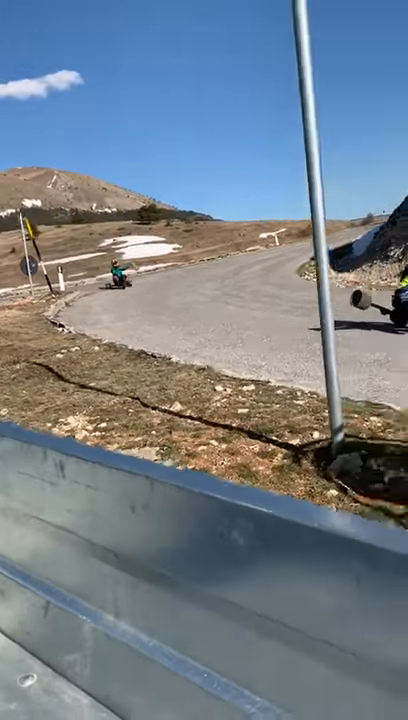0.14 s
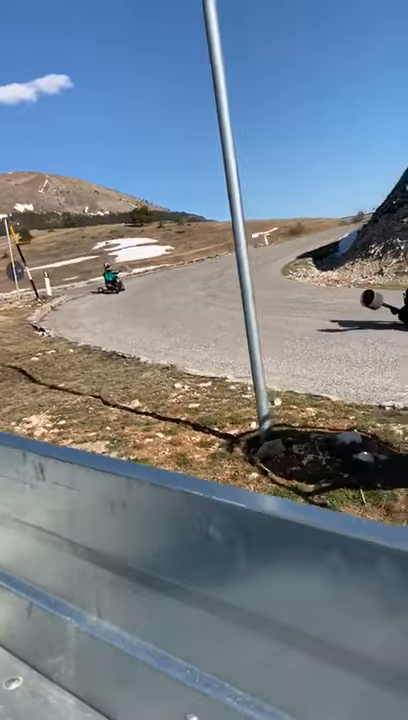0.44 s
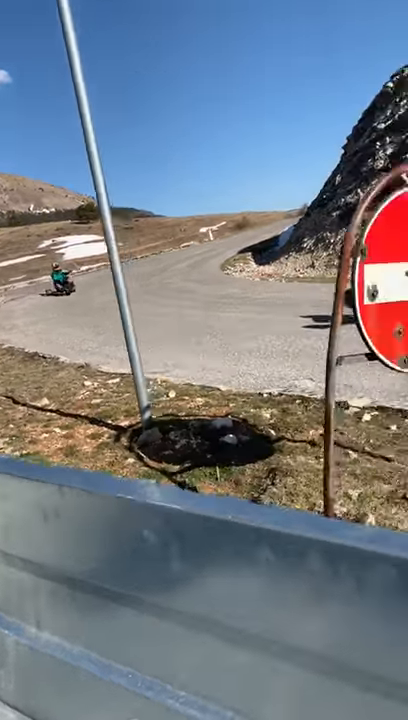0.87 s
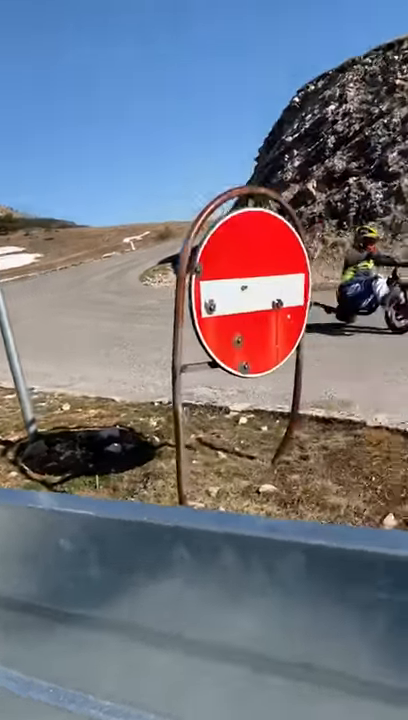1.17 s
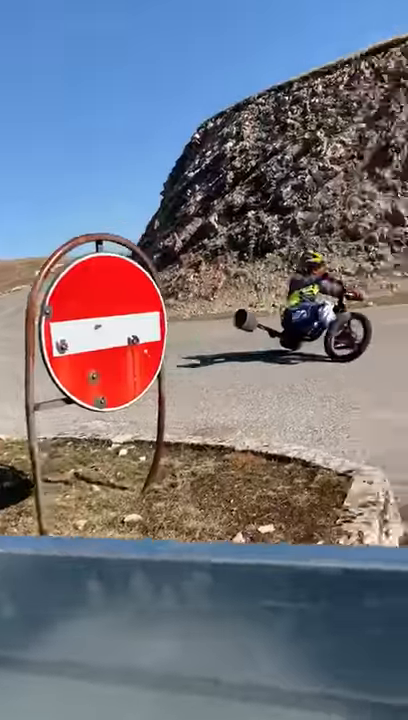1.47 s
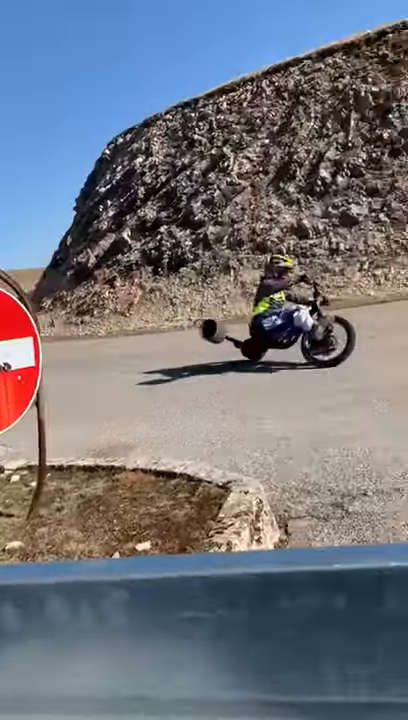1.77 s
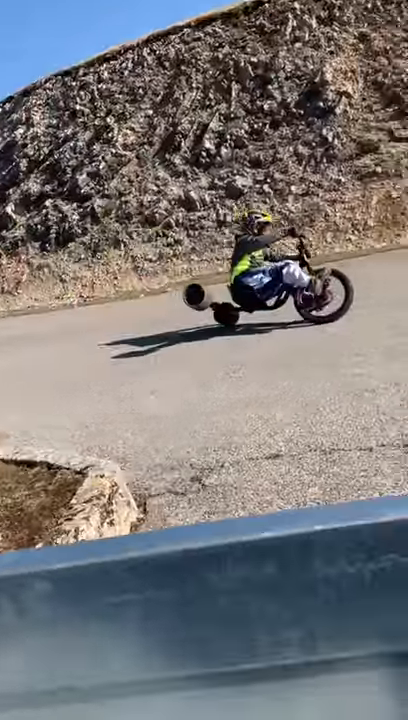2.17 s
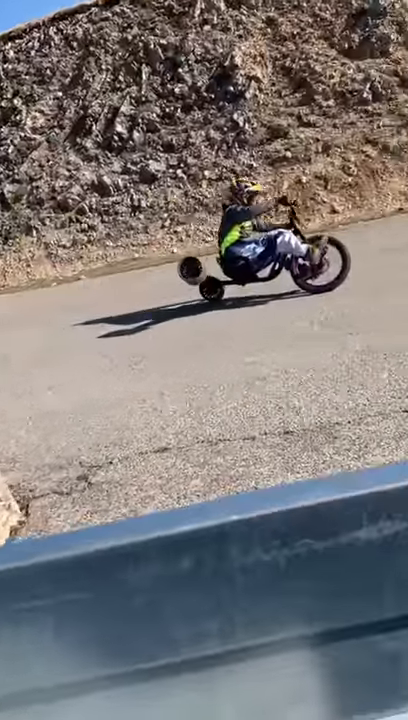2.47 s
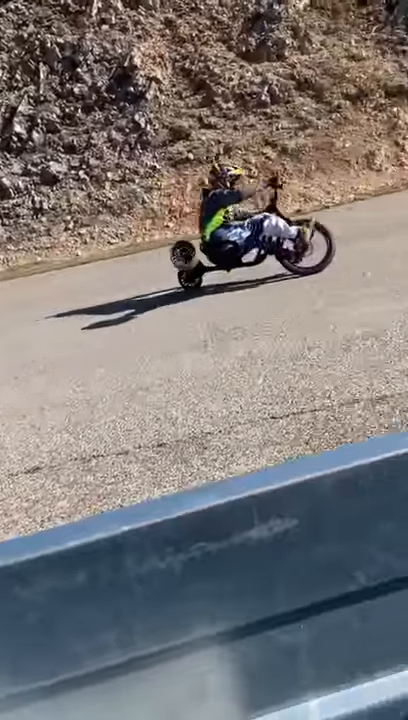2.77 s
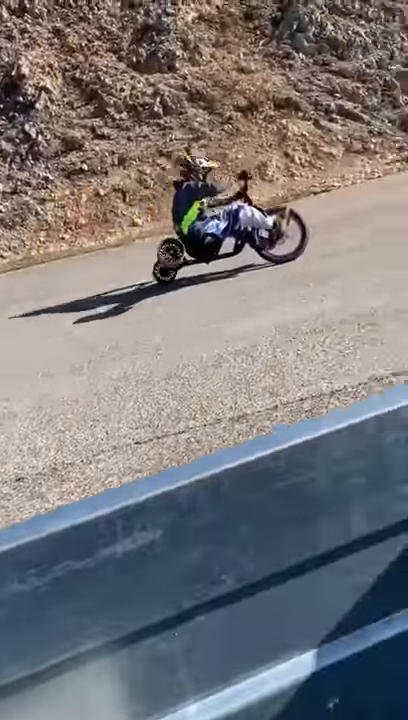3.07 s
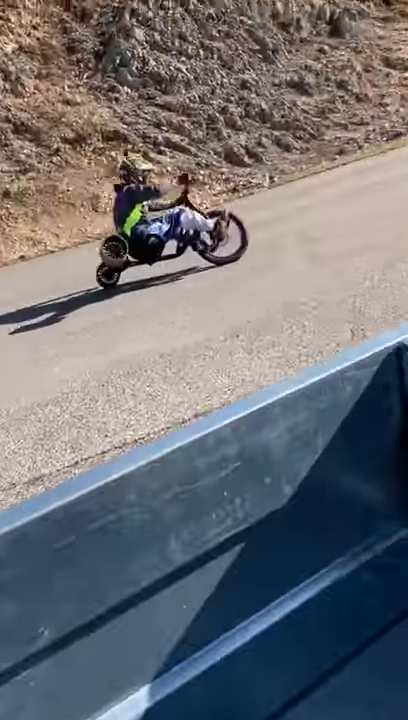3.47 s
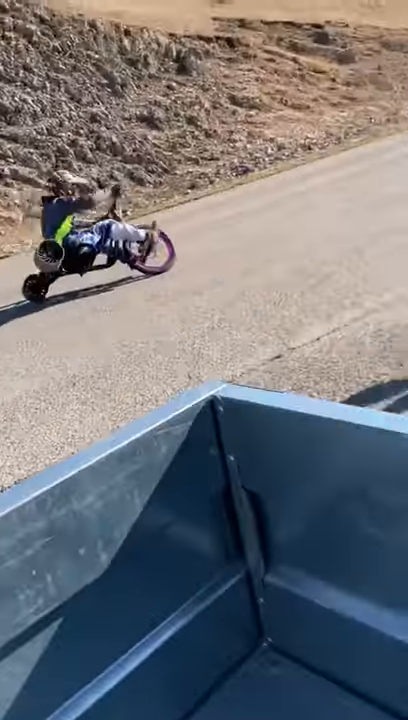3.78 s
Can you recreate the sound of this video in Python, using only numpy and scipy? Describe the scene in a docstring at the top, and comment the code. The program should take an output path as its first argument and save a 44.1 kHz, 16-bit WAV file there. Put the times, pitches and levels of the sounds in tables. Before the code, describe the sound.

Hard plastic trike wheels scrape and hiss over coarse asphalt behind a rattling, throbbing small truck

```python
"""Three-cylinder engine of a small truck, heard from its open steel bed: throbs, slows and pulls again, as
phase-locked harmonics coloured by the exhaust. A trike's hard plastic wheels scrape and hiss close behind on
coarse asphalt: filtered noise plus grit. Tailgate and side boards rattle as decaying modes with rebounds.
Tyre and exhaust rumble and wind thumps are shaped noise. Two ports hear it with phase and level differences."""
import sys
import numpy as np
from scipy import signal
from scipy.fft import rfft, irfft, next_fast_len
from scipy.io import wavfile
from scipy.ndimage import uniform_filter1d, map_coordinates

SR = 44100
rng = np.random.default_rng(int(sys.argv[2]) if len(sys.argv) > 2 else 0)


def unload_wav(signal):
    """Save mono or channel-first audio to the path in sys.argv[1] as 16-bit WAV at rate SR, clipped to [-1, 1]."""
    wavfile.write(
        sys.argv[1],
        SR,
        np.round(np.clip(np.atleast_2d(signal).T, -1, 1) * 32767).astype(np.int16),
    )


N = 173313

# Engine speed: (time [s], cycle rate [Hz])
ENGINE_SPEED = [(0, 27.8), (.3, 27.5), (.6, 26.8), (.9, 26), (1.3, 24.3), (1.65, 23), (2, 22), (2.25, 22.4),
                (2.55, 23.1), (2.75, 23.6), (3.05, 23.75), (3.93, 23.85)]
# Engine level: (time [s], level [dB])
ENGINE_LOAD = [(0, -22), (.3, -23), (.6, -25), (.9, -26), (1.3, -27.5), (1.65, -30.5), (2, -31.5),
               (2.25, -29.5), (2.55, -23.5), (2.75, -24.5), (3.05, -24.5), (3.5, -24), (3.8, -24.5),
               (3.93, -21)]
# Engine tones: (multiple of the cycle rate, relative level [dB])
ENGINE_HARMONICS = [(1, 2), (2, -3.5), (3, 0.5), (4, -1), (5, -5), (6, -2), (7, 1), (8, -7.5), (9, -6.5),
                    (10, -8)]
# Exhaust pipe colour: (frequency [Hz], gain [dB])
EXHAUST_GAIN = [(20, -23), (44, -9), (55, 3), (70, 3.5), (82, -5.5), (95, -2), (110, -10.5), (140, -14),
                (165, -14), (185, -21), (280, -23)]
TONE_WAVER_DB = 0.9
SWEEP_TURNS = 0.05986  # higher tones of each throb arrive first

# Wheel slide, levels before trim: (time [s], ring [dB], scrape [dB], rasp [dB], hiss [dB])
SLIDE_LEVELS = [(0.0, -43.5, -38.5, -43, -55.5), (0.23, -42.5, -37, -38.5, -49),
                (0.44, -36, -36.5, -41, -48.5), (0.63, -48, -35, -39, -44.5),
                (0.84, -37.5, -39.5, -42.5, -51.5), (1.07, -37, -39.5, -45, -53),
                (1.48, -41, -36.5, -39.5, -48.5), (1.7, -39.5, -35.5, -40.5, -47.5),
                (1.94, -35.5, -34.5, -40.5, -46.5), (2.14, -33.5, -32, -36.5, -40.5),
                (2.36, -34, -33, -40.5, -41.5), (2.53, -32, -31, -38, -38.5),
                (2.72, -29, -29.5, -39.5, -37), (2.88, -30.5, -29, -38.5, -35.5),
                (3.08, -30.5, -32.5, -37.5, -37), (3.15, -37, -38.5, -44, -43.5),
                (3.26, -36, -31.5, -42.5, -37), (3.44, -30.5, -32, -38.5, -39.5),
                (3.57, -33.5, -30, -37, -37), (3.8, -33.5, -31, -40, -41.5), (3.93, -29, -32, -34, -38.5)]
# Wheel sleeve resonances: (frequency [Hz], width [Hz], relative level [dB])
SLEEVE_MODES = [(733, 51, -3), (972, 45, -5), (990.4, 17, 3), (1000, 170, -7), (1073.7, 25, 4)]
# Scrape colour: (frequency [Hz], relative density [dB per Hz])
SCRAPE_COLOUR = [(300, -21), (500, -12.5), (900, -10.5), (1400, -7.5), (1700, -4), (1950, -5), (2250, -0.5),
                 (2400, -1.5), (2550, -2), (2800, -8.5), (3100, -11.5), (3600, -9.5)]
# Rasp colour: (frequency [Hz], relative density [dB per Hz])
RASP_COLOUR = [(2400, -22), (3000, -10), (3600, 0), (4000, -5), (4300, -1), (4650, -6), (5000, -2),
               (5300, -7), (5850, -5), (6050, -16), (7500, -30)]
# Hiss colour: (frequency [Hz], relative density [dB per Hz])
HISS_COLOUR = [(4500, -20), (6000, -3), (6800, 0), (7400, -2), (7800, 0), (8300, -5), (9000, -4),
               (9800, -8), (10200, -13), (10800, -6), (11300, -7), (11650, -12), (11750, -36), (12200, -45)]
# Wheels catching: (time [s], level jump [dB])
WHEEL_BITES = [(.395, 3), (.4564, 3), (1.0565, 4), (1.294, 2.5), (1.4386, 2.5), (1.907, 3), (2.51, 3),
               (3.001, 5.5), (3.188, 5), (3.471, 6), (3.746, 4)]
RING_TRIM_DB, SCRAPE_TRIM_DB, RASP_TRIM_DB, HISS_TRIM_DB = -2.0, 2.0, 5.0, 2.1
# friction noise that differs between the ports
RING_APART_DB, SCRAPE_APART_DB, RASP_APART_DB, HISS_APART_DB = -11, -5, -32, -32
# stones: rate, mean of the exponential size spread, largest size, decay time constant
GRIT_PER_S, GRIT_SPREAD_DB, GRIT_TOP_DB, GRIT_DECAY_S = 500, 4, 11, 0.0013
GRIT_DB, RING_GRIT_DB = -1, -9.0  # against the smooth friction
BITE_FADE_S, SLIP_S, SLIP_SHARE = 0.015, 0.024, 0.62  # louder after a bite, quieter just before
SHAKE_DB, JUDDER_DB, PATCHY_DB = 1, 1.1, 2.6  # swell per engine cycle, random unevenness, noise patches
RING_WAVER_DB, RING_TOP_HZ = 2.5, 2200  # per sleeve tone; roll-off corner

# Knocks at the steel, levels before trim:
# (time [s], peak [dB], brightness [dB], panel pitch [Hz], rebound against first knock [dB])
KNOCKS = [(0.014, -10, -15, 2250, -12), (0.0833, -18, -17, 1660, 2.5), (0.1195, -16, -24, 2540, -13),
          (0.2035, -7, -7, 2450, -7), (0.2303, -13, -8.5, 1760, -5), (0.2588, -13, -9.5, 2310, -10),
          (0.2826, -17.5, -12, 1650, -1), (0.394, -18, -11, 2720, -15), (0.4199, -11.5, -11, 2380, -5),
          (0.43, -15.5, -12, 2470, -4), (0.455, -18.5, -29, 2370, -1), (0.5421, -4.5, -13, 2550, -1),
          (0.5587, -6, -9.5, 2300, -7), (0.6477, -13, -13.5, 2510, 2.5), (0.6679, -7.5, -12, 2450, -9),
          (0.6905, -31, -6, 2400, -13), (0.7277, -24.5, -5.5, 2380, -6), (0.7664, -19, -11.5, 2540, 1),
          (0.849, -20.5, -6, 1810, -2), (0.8984, -22, -22, 2440, -8), (0.9107, -15, -24, 1790, -8),
          (0.983, -4.5, -20, 1980, -20), (1.055, -17, -14, 1950, -19), (1.0635, -17, -16, 2000, -8),
          (1.1402, -16, -17, 2270, -7), (1.1613, -27, -18, 2640, -8), (1.2305, -13, -17, 2370, -3),
          (1.2935, -22.5, -3, 2010, -4), (1.4375, -19.5, -7, 2680, -2), (1.4598, -17, -9, 1710, -10),
          (1.544, -22, -28, 1870, -8), (1.5813, -21, -26, 1710, -1), (1.6122, -17.5, -20, 2240, -3),
          (1.768, -23, -18, 2560, -8), (1.9255, -18, -15, 2300, -2), (2.0378, -14.5, -10, 2200, -2),
          (2.134, -9, -14, 2430, -2), (2.203, -22, -19, 2120, -11), (2.3126, -21, -15, 2530, -6),
          (2.4138, -7, -19, 2300, -17), (2.7643, -5.5, -24, 2290, -4), (2.8183, -21, -18, 2390, -10),
          (2.9363, -12, -10, 2260, -1), (3.0064, -20, -9, 2340, 2), (3.0672, -5.5, -17.5, 2340, -4),
          (3.1886, -29, -3.5, 2230, -3), (3.2615, -19, -23, 2150, -8), (3.4027, -23, -16, 2250, -2),
          (3.469, -29, -12, 2040, -8), (3.5613, -27, -17, 2360, -12), (3.7462, -16.5, -6, 2070, -10),
          (3.893, -17, -15, 2200, -6)]
# Panel modes: (ratio to the panel pitch, mean level [dB], t60 [s])
PANEL_MODES = [(.55, -10, 0.0055), (.84, -18.5, 0.015), (1, 0.5, 0.011), (1.13, -8.5, 0.0069)]
# Latch modes before scaling: (frequency [Hz], mean level [dB], t60 [s])
LATCH_MODES = [(3160, 1.5, 0.013), (3735, 9, 0.0088), (4290, 4.5, 0.019), (5400, -23, .009),
               (6750, -4.5, 0.011), (8100, -4.5, 0.0064), (10970, -17.5, 0.0062)]
LATCH_SCALE, TRAVEL_S, REBOUND_S, RISE_S = 0.948, 0.0015, 0.0024, 0.0001  # rebound lag varies
KNOCK_TRIM_DB, BRIGHT_TRIM_DB = -4.5, 2
CRACK_DB, CRACK_T60_S = -3, 0.003  # noisy snap, relative to brightness

# Tyre and exhaust rumble: (time [s], level [dB])
ROAD_LEVEL = [(0.0, -39), (0.6, -35.5), (1.21, -38), (2.25, -35.5), (2.76, -33), (3.05, -33), (3.44, -32.5),
              (3.93, -30.5)]
# Rumble colour: (frequency [Hz], relative density [dB per Hz])
RUMBLE_COLOUR = [(59, -58), (100, -3), (124, -12), (167, -10), (296, -15), (595, -23), (715, -20),
                 (900, -27), (1170, -48), (1980, -120)]
RUMBLE_ALIKE = 0.7  # power share heard alike by both ports

# Wind on the microphone: (time [s], level [dB])
WIND_LEVEL = [(0, -34), (.08, -21), (.2, -23), (.33, -31), (.4, -27), (.48, -34), (.59, -28), (.83, -36),
              (.95, -25), (1.02, -29), (1.08, -41), (1.3, -40), (2, -46), (2.65, -40), (3.4, -42),
              (3.5, -36), (3.73, -43), (3.93, -38)]
# Wind colour: (frequency [Hz], relative density [dB per Hz])
WIND_COLOUR = [(10, -30), (22, -6), (36, 0), (52, -6), (68, 0), (85, -8), (120, -16), (200, -28),
               (400, -70)]

# Port phase: (frequency [Hz], left lead [rad])
PORT_LEAD = [(0, 0), (430, .7), (1120, -.1), (2760, .7), (3360, 2), (4400, 1.9), (4780, 3.11), (5500, 3.17),
             (5650, 4.4), (6370, 6.1), (7000, 6.28), (9300, 6.28), (9990, 6.8), (10400, 8), (11000, 8.7),
             (11400, 9.42), (12200, 9.42)]
# Port balance: (frequency [Hz], left over right [dB])
LEFT_OVER_RIGHT = [(60, -.5), (130, -4), (270, -1.5), (570, -1.5), (1220, -.5), (2580, -2), (4800, 0),
                   (12000, 0)]
TOP_HZ = 12200


def amp(db):
    """Amplitude ratio of a level in dB."""
    return 10 ** (np.asarray(db) / 20)


def unit(x):
    """x scaled to rms 1."""
    return x / np.sqrt(np.mean(x ** 2) + 1e-20)


def along(points, hz):
    """Interpolate (Hz, value) points on a log axis."""
    f, v = np.transpose(points)
    return np.interp(np.log(hz + 1), np.log(f + 1), v, left=v[0], right=v[-1])


def curves(rows):
    """One value per sample for each column after the time."""
    s, *cols = np.transpose(rows)
    return [np.interp(np.arange(N) / SR, s, c) for c in cols]


def wobble(knots_per_s):
    """Smooth random curve through normal-distributed knots."""
    return map_coordinates(rng.standard_normal(400), [np.arange(N) * knots_per_s / SR])


def filtered(x, response):
    """x through a complex response of frequency."""
    m = next_fast_len(N + SR // 2)
    return irfft(rfft(x, m) * response(np.fft.rfftfreq(m, 1 / SR)), m)[..., :N]


def shaped(x, colour):
    """x with the given colour, silent outside its end points, rms 1."""
    low_hz, high_hz = colour[0][0], colour[-1][0]
    return unit(filtered(x, lambda hz: amp(along(colour, hz)) * (hz > low_hz) * (hz < high_hz)))


def patchy(depth_db):
    """White noise with random patches of gain in time and frequency."""
    z = signal.stft(rng.standard_normal(N), nperseg=512)[2]
    field = uniform_filter1d(rng.standard_normal(z.shape), size=4, axis=0)
    field = uniform_filter1d(field, size=8, axis=1)
    return unit(signal.istft(z * amp(depth_db * unit(field)), nperseg=512)[1][:N])


def engine(turns):
    """Unsteady tones on whole multiples of the cycle rate, coloured by the exhaust pipe."""
    (speed_hz,), (load_db,) = curves(ENGINE_SPEED), curves(ENGINE_LOAD)
    out = np.zeros(N)
    for k, db in ENGINE_HARMONICS:
        level_db = load_db + db + along(EXHAUST_GAIN, k * speed_hz) + TONE_WAVER_DB * wobble(9)
        out += np.sqrt(2) * amp(level_db) * np.cos(2 * np.pi * (k * turns + SWEEP_TURNS * k ** 2))
    return out


def bites():
    """Level change in dB: the slide thins out, then jumps as the wheels catch."""
    t = np.arange(N) / SR
    change_db = np.zeros(N)
    for s, db in WHEEL_BITES:
        slip = -SLIP_SHARE * np.exp(-abs(t - s) / SLIP_S)
        catch = np.exp(-abs(t - s) / BITE_FADE_S)
        change_db += db * np.where(t >= s, catch, slip)
    return change_db


def grit_envelope():
    """Stones crushed at random moments, each a sudden onset with exponential decay."""
    draw = rng.random((2, N))
    size_db = np.minimum(-GRIT_SPREAD_DB * np.log(draw[1] + 1e-9), GRIT_TOP_DB)
    hits = (draw[0] < GRIT_PER_S / SR) * amp(size_db)
    return signal.lfilter([1], [1, -np.exp(-1 / (GRIT_DECAY_S * SR))], hits)


def wheels(turns):
    """Smooth friction plus grit excites the sleeves' ring, a broad scrape, a rasp and a hiss."""
    ring_db, scrape_db, rasp_db, hiss_db = curves(SLIDE_LEVELS)
    crush = grit_envelope()
    judder_db = bites() + SHAKE_DB * np.cos(2 * np.pi * (turns + 0.16)) + JUDDER_DB * wobble(35)

    def rub(grit_db, apart_db):
        grit = unit(crush * rng.standard_normal(N))
        apart = rng.standard_normal((2, N))
        return amp(judder_db) * (patchy(PATCHY_DB) + amp(grit_db) * grit + amp(apart_db) * apart)

    drive = rub(RING_GRIT_DB, RING_APART_DB)
    ring = np.zeros((2, N))
    for centre_hz, width_hz, db in SLEEVE_MODES:
        def resonance(f):
            damping = 1j * f * width_hz
            return damping / (centre_hz ** 2 - f * f + damping) / (1 + (f / RING_TOP_HZ) ** 6)
        ring += amp(db + RING_WAVER_DB * wobble(14)) * filtered(drive, resonance)
    out = amp(ring_db + RING_TRIM_DB + 1.2 * wobble(16)) * unit(ring)

    for level_db, colour, apart_db in (
            (scrape_db + SCRAPE_TRIM_DB, SCRAPE_COLOUR, SCRAPE_APART_DB),
            (rasp_db + RASP_TRIM_DB, RASP_COLOUR, RASP_APART_DB),
            (hiss_db + HISS_TRIM_DB, HISS_COLOUR, HISS_APART_DB)):
        out += amp(level_db) * shaped(rub(GRIT_DB, apart_db), colour)
    return out


def struck(modes, scale, t):
    """Sum of decaying sines, each with a slightly random level and pitch."""
    out = np.zeros(len(t))
    for ratio, db, t60_s in modes:
        hz = ratio * scale * rng.normal(1, 0.027)
        out += amp(db + rng.normal(0, 1.0) - 60 * t / t60_s) * np.sin(2 * np.pi * hz * t)
    return out


def rattles():
    """Loose steel knocks twice in a few milliseconds; bright knocks ring the latch more than the panel."""
    out, t = np.zeros(N + SR), np.arange(SR // 20) / SR
    for s, peak_db, bright_db, pitch_hz, rebound_db in KNOCKS:
        rebound_s = REBOUND_S * rng.uniform(0.824, 1.255)
        for lag_s, change_db in (0, 0), (rebound_s, rebound_db):
            crack = amp(CRACK_DB - 60 * t / CRACK_T60_S) * np.diff(rng.standard_normal(len(t) + 1))
            bright = amp(bright_db + BRIGHT_TRIM_DB) * (struck(LATCH_MODES, LATCH_SCALE, t) + crack)
            knock = (struck(PANEL_MODES, pitch_hz, t) + bright) * (1 - np.exp(-t / RISE_S))
            start = round((s + TRAVEL_S + lag_s) * SR)
            out[start:][:len(t)] += amp(peak_db + KNOCK_TRIM_DB + change_db) * knock
    return out[:N]


def road():
    """Tyre and exhaust rumble: low patchy noise, partly different at each port."""
    level_db, = curves(ROAD_LEVEL)
    shared, left, right = (shaped(patchy(depth_db=1.0), RUMBLE_COLOUR) for _ in range(3))
    rumble = np.sqrt(RUMBLE_ALIKE) * shared + np.sqrt(1 - RUMBLE_ALIKE) * np.array([left, right])
    return amp(level_db + 1.0 * wobble(15)) * rumble


def wind():
    """Low lumpy buffeting of the microphone: shaped noise with a wobbling level."""
    level_db, = curves(WIND_LEVEL)
    buffeting = amp(0.76 * wobble(29.0)) * shaped(rng.standard_normal(N), WIND_COLOUR)
    return amp(level_db) * unit(buffeting)


def scene():
    """Sum of all sources; the engine phase also shakes the wheel sound."""
    turns = np.cumsum(curves(ENGINE_SPEED)[0]) / SR
    return engine(turns) + wheels(turns) + rattles() + road() + wind()


def record(dry):
    """Port phase and level differences split evenly left and right; nothing kept from TOP_HZ up."""
    side = np.array([[0.5], [-0.5]])

    def ports(hz):
        lead_rad = np.interp(hz, *np.transpose(PORT_LEAD))
        return amp(side * along(LEFT_OVER_RIGHT, hz)) * np.exp(1j * side * lead_rad) * (hz < TOP_HZ)

    return filtered(dry, ports)


dry = scene()
out = record(dry)
unload_wav(out)
```